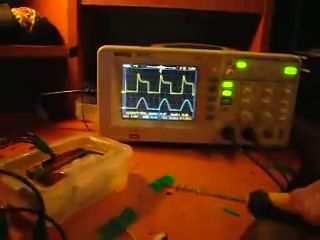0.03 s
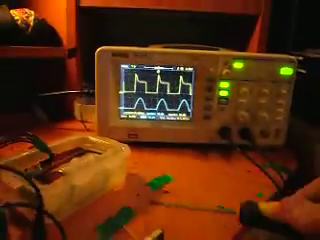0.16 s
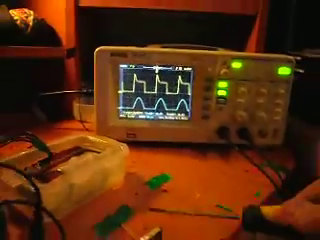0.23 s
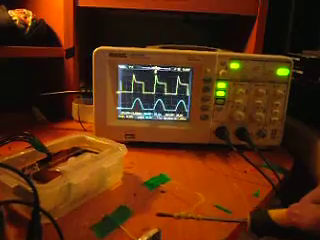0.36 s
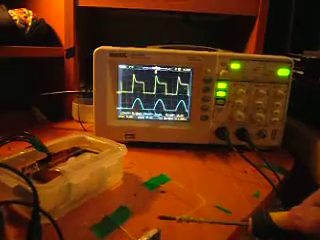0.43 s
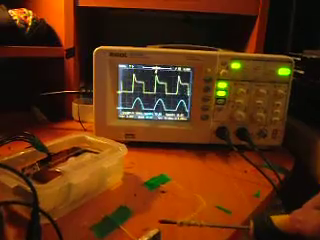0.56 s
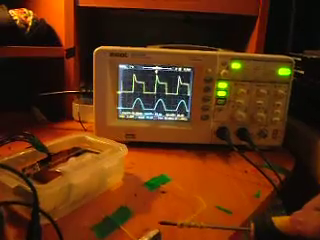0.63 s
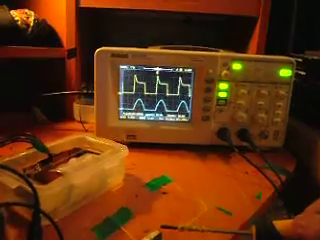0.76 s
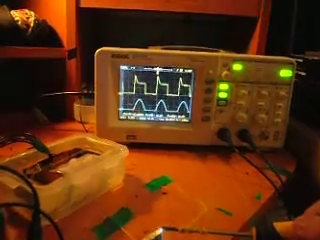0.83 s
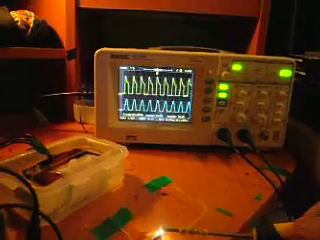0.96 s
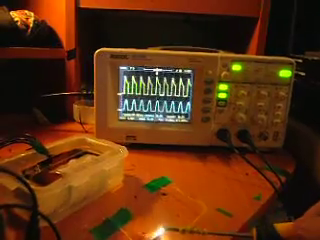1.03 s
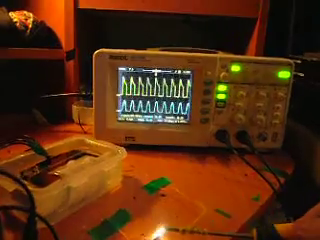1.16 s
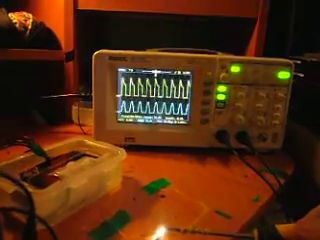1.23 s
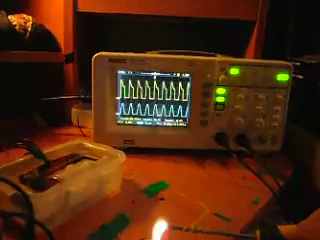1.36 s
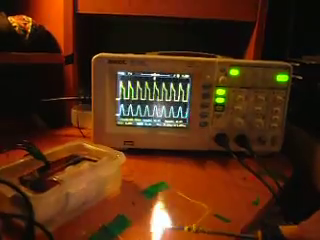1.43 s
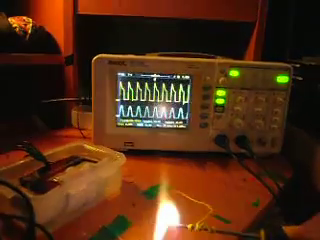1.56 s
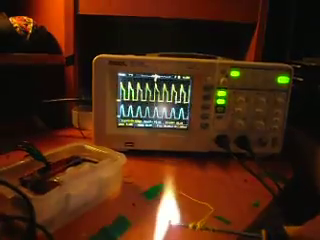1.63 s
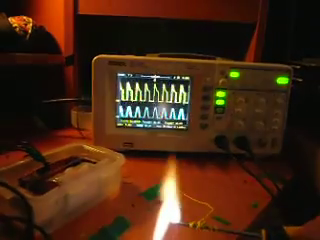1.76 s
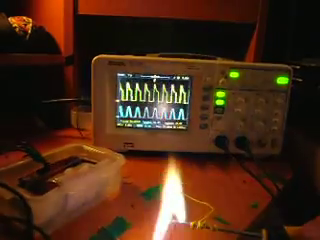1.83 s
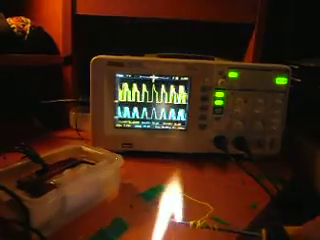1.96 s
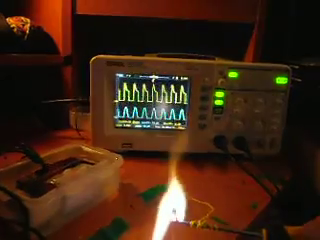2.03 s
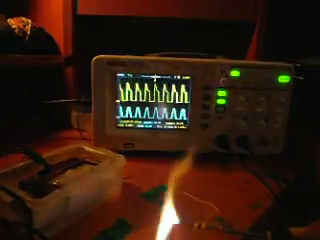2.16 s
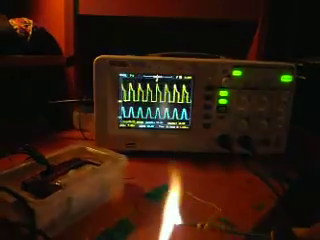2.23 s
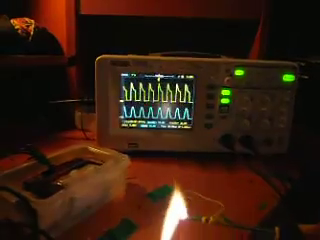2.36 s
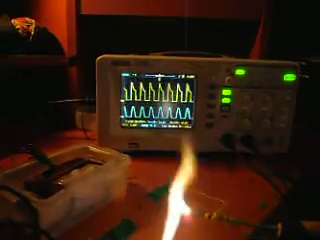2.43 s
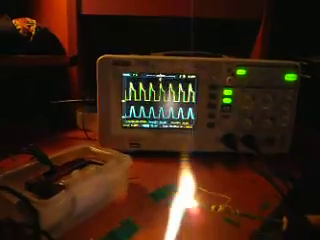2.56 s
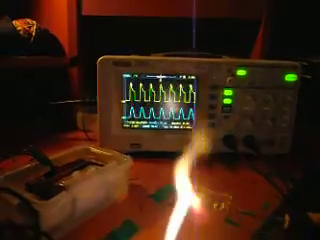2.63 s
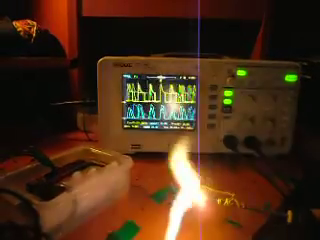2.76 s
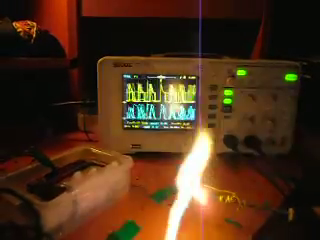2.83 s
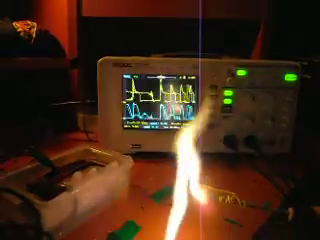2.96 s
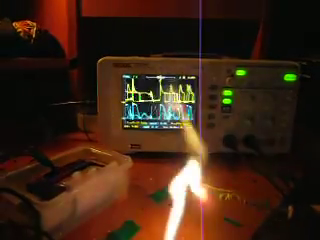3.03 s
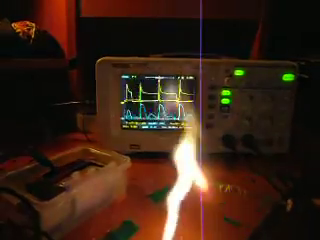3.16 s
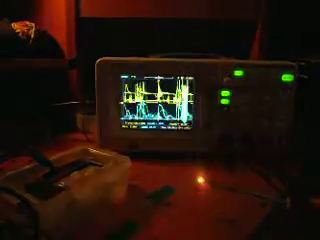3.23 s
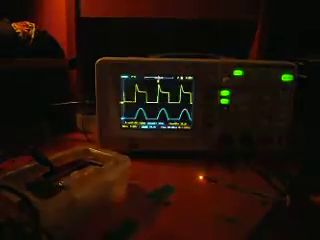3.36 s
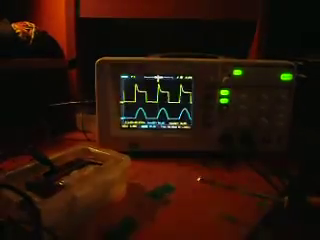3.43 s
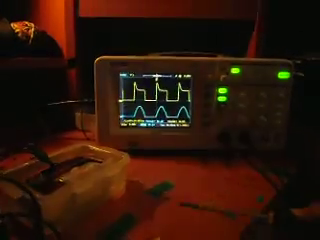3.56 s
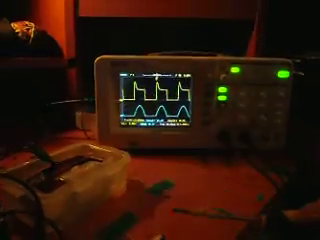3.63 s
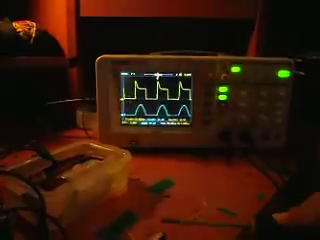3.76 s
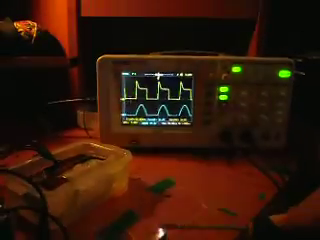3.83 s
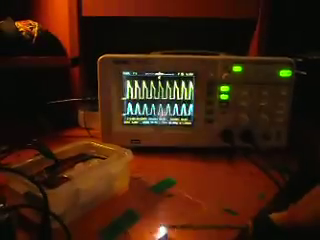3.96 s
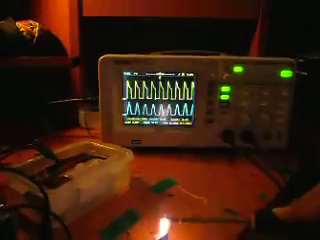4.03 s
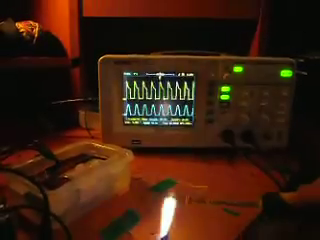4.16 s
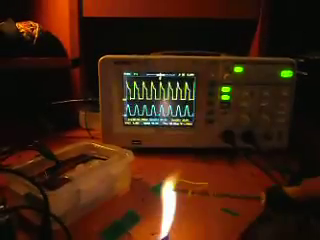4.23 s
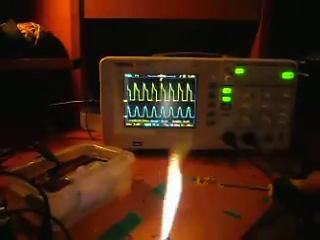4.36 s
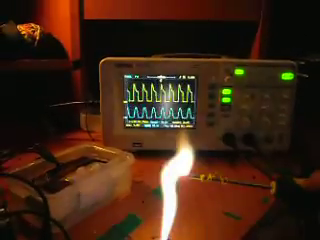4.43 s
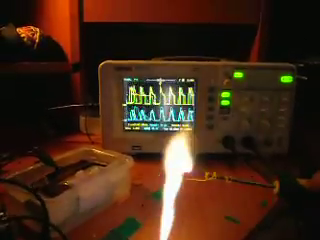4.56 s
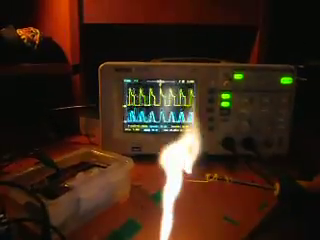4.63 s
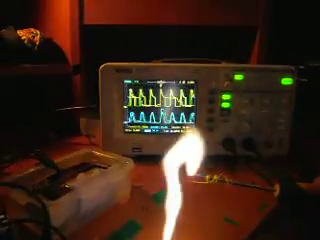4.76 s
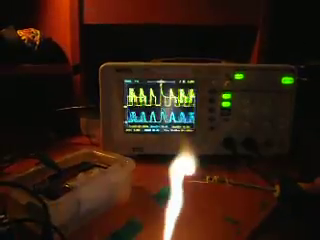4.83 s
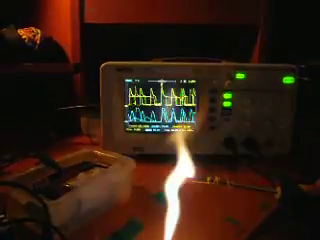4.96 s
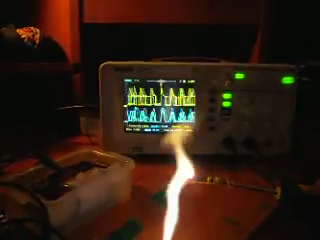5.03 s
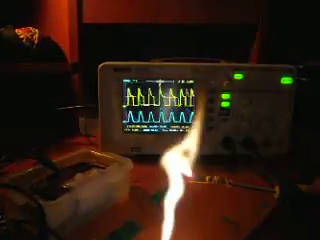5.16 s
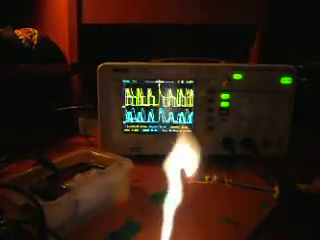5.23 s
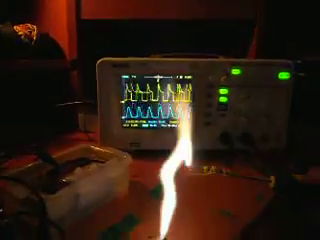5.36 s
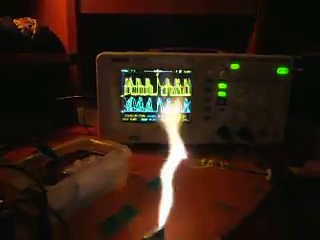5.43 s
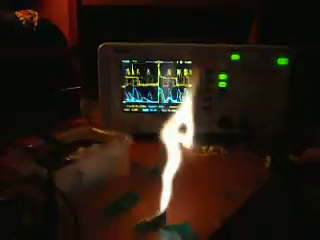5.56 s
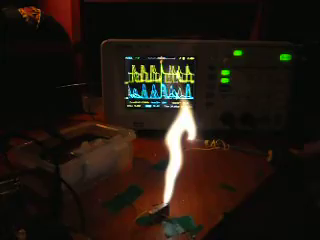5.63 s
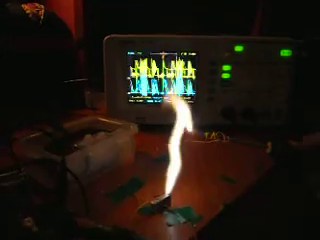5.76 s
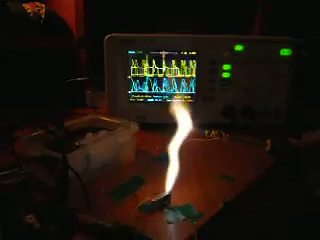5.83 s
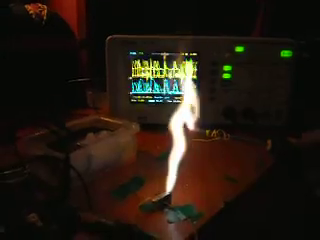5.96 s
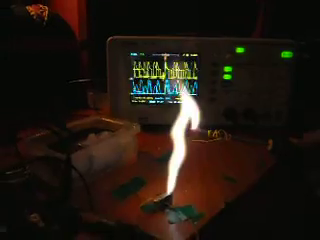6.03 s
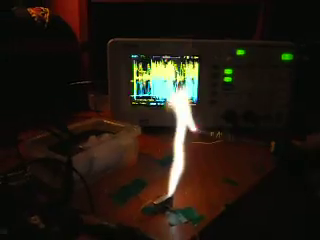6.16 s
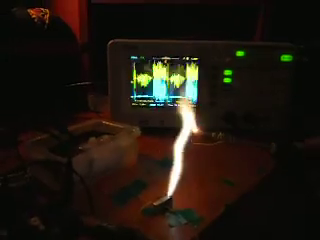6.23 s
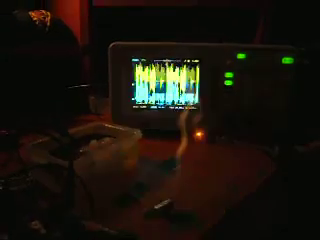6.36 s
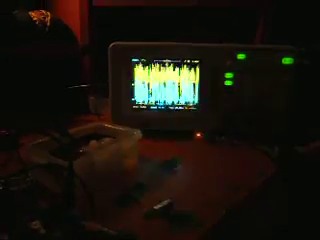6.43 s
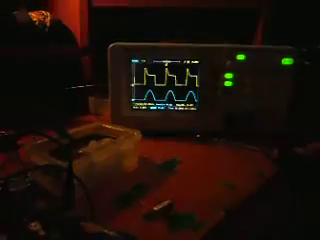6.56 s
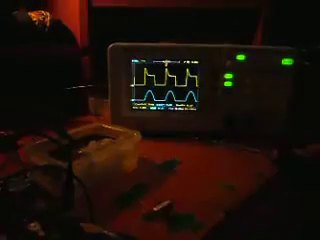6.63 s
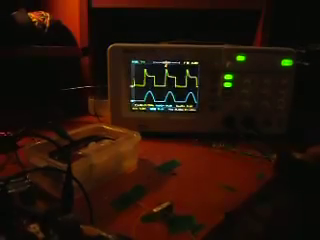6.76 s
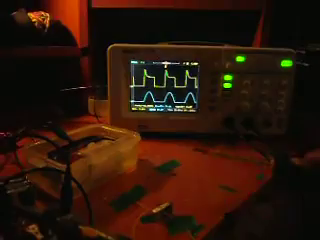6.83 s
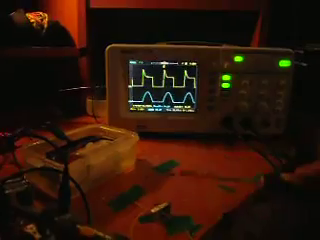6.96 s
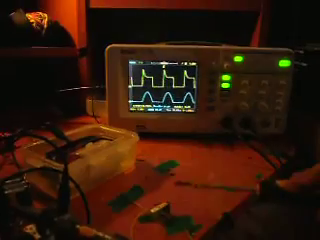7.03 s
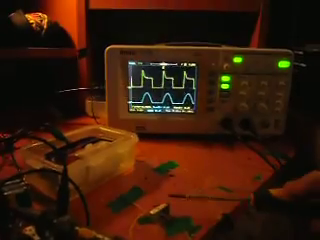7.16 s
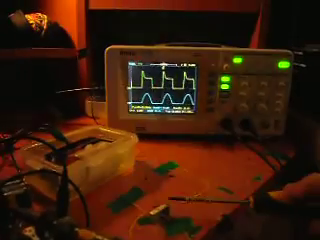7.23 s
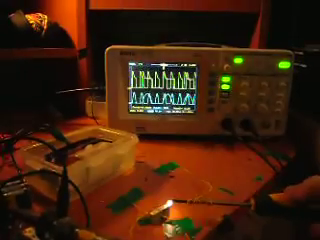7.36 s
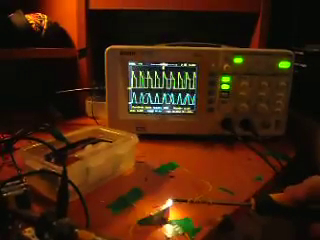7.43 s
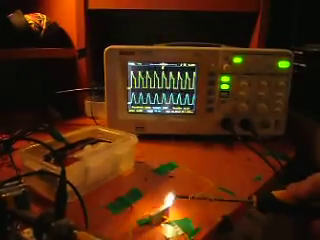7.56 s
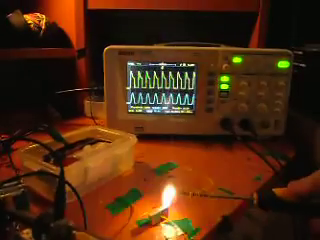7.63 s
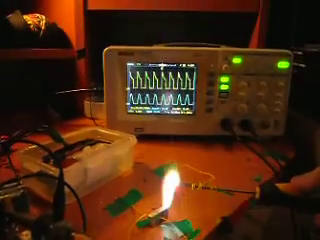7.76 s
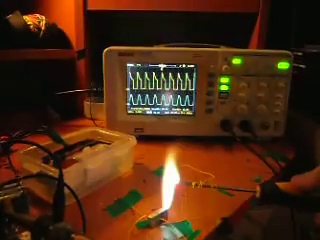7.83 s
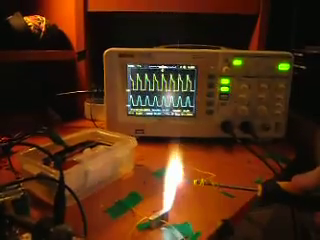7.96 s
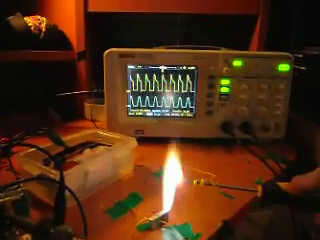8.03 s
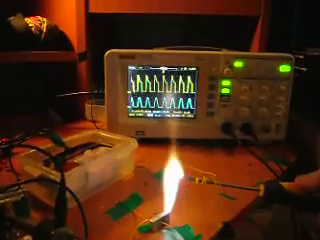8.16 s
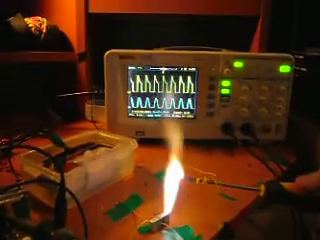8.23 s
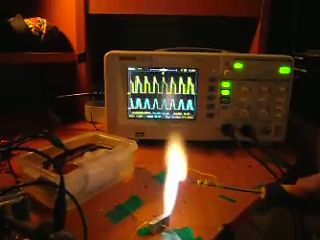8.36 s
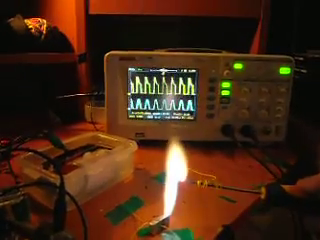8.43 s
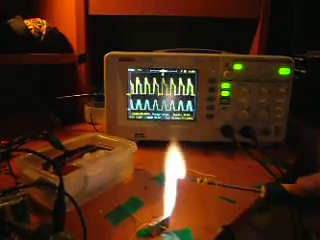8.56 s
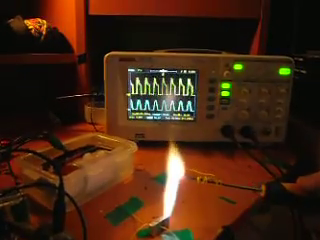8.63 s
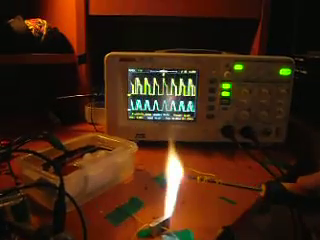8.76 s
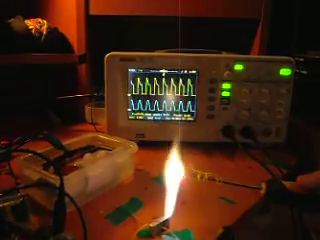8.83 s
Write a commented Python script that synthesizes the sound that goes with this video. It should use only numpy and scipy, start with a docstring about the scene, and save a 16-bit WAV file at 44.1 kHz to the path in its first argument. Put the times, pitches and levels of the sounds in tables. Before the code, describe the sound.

High-voltage arc drawn three times on a bench: snap, sputter and fry, harsh overloaded squeals twice, then a quieter crackling third with regular snaps.

```python
"""A steady thin tone and a faint hush come first, then snaps, as a homemade transformer draws an arc three times.
Random micro-discharges make the short arc sizzle and sputter; ringing ticks fry at its tip.
Stretched long, the arc breaks and restrikes in loud falling squeals: harmonics of a collapsing pulse rate.
The bench top adds one echo, a small room a short tail, and the squeals overload the microphone."""
import sys
import numpy as np
from scipy import signal
from scipy.fft import rfft, irfft
from scipy.io import wavfile

SR = 44100
rng = np.random.default_rng(int(sys.argv[2]) if len(sys.argv) > 2 else 0)


def generate_wav(sig):
    """Save sig (samples, or channels by samples) to the path in sys.argv[1] as 16-bit PCM at SR."""
    pcm = np.round(np.clip(np.atleast_2d(sig).T, -1, 1) * 32767).astype(np.int16)
    wavfile.write(sys.argv[1], SR, pcm)


N = 391608
T = np.arange(N) / SR  # seconds
HOLD_HZ, KNEE_HZ = 1947, 1628.5  # restrike rate: settled, and at the start of a dive


def undb(db):
    """Decibels to gain."""
    return 10 ** (np.asarray(db) / 20)


def curve(rows):
    """Join (s, value) rows by straight lines."""
    return np.interp(T, *np.transpose(rows))


def add(track, start_s, sound):
    """Mix a sound into a track at a time."""
    i = int(start_s * SR)
    track[i:i + len(sound)] += sound[:max(N - i, 0)]


def wander(n, hz):
    """Random line of spread near 1 that takes hz new values a second."""
    at = np.arange(n) * hz / SR
    knots = int(n * hz / SR) + 2
    return 1.2 * np.interp(at, np.arange(knots), rng.standard_normal(knots))


def gate(length_s):
    """Times and envelope of a burst that rises in about 1 ms and falls in 2 ms."""
    t = np.arange(max(int(length_s * SR), 2) + SR // 500) / SR
    return t, np.clip(np.minimum(t * 900, (t[-1] - t) * 500), 0, 1)


def decay(t, t60_s):
    """Exponential decay by 60 dB in t60_s."""
    return np.exp(-np.log(1000) * t / t60_s)


def response(points, size=2048):
    """Minimum-phase impulse response of a (Hz, dB) colour, low-passed at 9 kHz, with unit energy."""
    hz, db = np.transpose(points)
    bin_hz = np.arange(size // 2 + 1) * SR / size
    log_gain = np.log(undb(np.interp(np.log(bin_hz + 1), np.log(hz), db)))
    cepstrum = irfft(log_gain)[:size // 2]
    cepstrum[1:] *= 2  # fold to the causal side
    h = irfft(np.exp(rfft(cepstrum, size)))
    h = signal.sosfilt(signal.butter(8, 9000, fs=SR, output="sos"), h)
    return h / np.linalg.norm(h)


def through(x, h):
    """Pass a sound through an impulse response."""
    return signal.oaconvolve(x, h)[:N]


def sparks(per_second, scatter_db):
    """Randomly timed micro-discharges of unequal size and random sign, rms 1."""
    size = undb(scatter_db * np.minimum(rng.standard_normal(N), 2))
    clicks = (rng.random(N) < per_second / SR) * size
    clicks = clicks * rng.choice([-1, 1], N)
    return clicks / np.std(clicks)


def tone(tone_hz=873, drift_hz=.5, whine_hz=5900, whine_db=-75):
    """The electronics sing one nearly pure note, with a very faint whine far above it."""
    # Steady note. Each row: time in seconds, rms level in dB before the slight waver.
    tone_level = [(0, -57), (.6, -73), (1.1, -54), (2.5, -49.5), (3.15, -44.5), (3.6, -42), (4.3, -43),
                  (4.9, -43), (6.35, -66), (6.6, -58.5), (7.55, -67), (7.8, -56), (8.88, -50.5)]
    phase = 2 * np.pi * np.cumsum(tone_hz + drift_hz * wander(N, 6.7)) / SR
    waver_db = .5 * wander(N, 10)
    note = undb(curve(tone_level) + waver_db) * np.sin(phase)
    whine = undb(whine_db) * np.sin(2 * np.pi * whine_hz * T)
    return np.sqrt(2) * (note + whine)


def hush(level_db=-55, waver_db=.5):
    """Coloured noise of the room, its level wavering slightly."""
    # Hush spectrum. Each row: frequency in Hz, relative density in dB per Hz.
    hush_colour = [(15, -52.5), (25, -10.5), (141, -18), (290, -15.5), (351, -17), (387, -13), (492, -9.5),
                   (641, -15.5), (855, -8.5), (1560, -23), (7800, -27.5), (10100, -64), (17200, -120)]
    noise = through(rng.standard_normal(N), response(hush_colour))
    return noise * undb(level_db + waver_db * wander(N, 8.1))


def snaps(trim_db=-3.5, fizz=.16, fizz_s=.0016, lag_s=.000997):
    """One breakdown: a sharp pressure step with a brief fizz behind it, then a weaker afterstrike."""
    # Single breakdowns. Each row: time in seconds, level in dB before trim.
    snap_rows = [(0.756, -26.5), (1.597, -18), (1.669, -15), (1.773, -14.5), (1.844, -12), (1.958, -13),
                 (3.767, -16.5), (7.227, -15.5), (8.132, -16.5), (8.212, -18), (8.281, -17), (8.353, -18),
                 (8.429, -17.5), (8.499, -16.5), (8.567, -24.5), (8.647, -23), (8.703, -23), (8.789, -21),
                 (8.829, -23.5)]
    # Snap spectrum. Each row: frequency in Hz, relative density in dB per Hz.
    snap_colour = [(40, -13), (200, 5.5), (500, 4), (1000, 6), (1800, -1), (3500, 11), (5000, -1),
                   (7400, -7), (9000, -36)]
    afterstrike_s, afterstrike_db = .013, -12.5
    out, t = np.zeros(N), np.arange(SR // 100) / SR
    for start_s, db in snap_rows:
        for delay_s, drop_db in ((0, 0), (afterstrike_s, afterstrike_db)):
            crack = fizz * rng.standard_normal(len(t)) * np.exp(-t / fizz_s)
            crack[0] = 1
            add(out, start_s + lag_s + delay_s, undb(db + drop_db + trim_db) * crack)
    h = response(snap_colour)
    return through(out, h / np.abs(h).max())


def sizzle(top_db=-40.5, cooling_s=.015):
    """The burning arc crackles in clumps of a few ms, louder up to a ceiling as it is drawn, then fades."""
    # Draws of the arc. Each row: ignition in seconds, burning time in seconds,
    # level at ignition in dB before clumping, growth in dB per second.
    draw_rows = [(.756, 2.36, -58.5, 5.5), (3.77, 2.52, -59, 25.5), (7.226, 1.7, -62.5, 6)]
    # Sizzle spectrum. Each row: frequency in Hz, relative density in dB per Hz.
    sizzle_colour = [(100, -20.5), (1500, -14), (2800, -1), (4300, -1), (5500, -4), (7300, -7),
                     (9000, -12.5)]
    strength = np.zeros(N)
    for start_s, burn_s, db, db_per_s in draw_rows:
        age_s = np.maximum(T - start_s, 0)
        level = undb(np.minimum(db + db_per_s * age_s, top_db))
        fade = np.exp(-np.maximum(age_s - burn_s, 0) / cooling_s)
        strength += (T > start_s) * level * fade
    clumps_db = 5.5 * np.minimum(wander(N, 260), 1.8) - 3
    return through(sparks(2000, 1.8) * strength * undb(clumps_db), response(sizzle_colour))


def rod(ring_hz=365, t60_s=.23):
    """The hand-held electrode rings dully, as one decaying sine, when it touches its contact."""
    # Touches of the rod. Each row: time in seconds, initial amplitude in dB.
    touch_rows = [(0.759, -47.5), (.82, -47.5), (0.988, -48), (1.241, -50.5), (3.769, -51), (7.228, -51)]
    out, t = np.zeros(N), np.arange(SR // 2) / SR
    for start_s, db in touch_rows:
        add(out, start_s, undb(db) * np.sin(2 * np.pi * ring_hz * t) * decay(t, t60_s))
    return out


def frying(per_second=380, scatter_db=6.0, t60_s=.014, spread=.075):
    """Tiny ringing ticks at the metal tip, whose pitch sinks as it heats up."""
    # Frying spells. Each row: start in seconds, length in seconds, first pitch in Hz,
    # last pitch in Hz, rms level in dB over the length.
    frying_rows = [(1.228, 0.17, 4240, 3780, -43), (3.894, 0.065, 4330, 4000, -40),
                   (7.385, 0.32, 4300, 3770, -53)]
    out, t = np.zeros(N), T[:SR // 50]
    for start_s, length_s, first_hz, last_hz, db in frying_rows:
        when, chance = rng.random(SR // 100), rng.standard_normal((SR // 100, 2))
        ticks = np.zeros(N)
        for share, (size, detune) in zip(when[:int(per_second * length_s)], chance):
            hz = (first_hz + share * (last_hz - first_hz)) * (1 + spread * detune)
            tick = np.sin(2 * np.pi * hz * t) * decay(t, t60_s)
            add(ticks, start_s + share * length_s, undb(scatter_db * size) * tick)
        out += undb(db) * ticks * np.sqrt(length_s * SR / np.sum(ticks ** 2))
    return out


def sputters(flutter_db=3.5):
    """Spurts of dense micro-discharges at the electrode tip, each with its own level and a random grain."""
    # Sputter spurts. Each row: start in seconds, length in seconds, rms level in dB before colouring.
    sputter_rows = [ (1.302, 0.027, -42), (1.343, 0.026, -38), (1.431, 0.017, -35.5), (1.452, 0.063, -34),
                    (1.522, 0.024, -34.5), (1.57, .014, -35), (1.604, 0.041, -38), (1.673, 0.019, -35.5),
                    (1.752, 0.0082, -34.5), (1.78, 0.0074, -31.5), (1.844, 0.0097, -34),
                    (1.886, 0.0099, -37), (1.955, 0.028, -33), (1.994, 0.0091, -36), (2.004, 0.0092, -29.5),
                    (2.382, .008, -38.5), (2.412, 0.014, -38.5), (2.539, .012, -38), (3.109, .009, -26),
                    (4.102, 0.02, -38), (4.241, 0.011, -34.5), (4.397, 0.001, -12), (4.472, 0.0053, -18.5),
                    (4.668, 0.0033, -19), (4.761, 0.022, -34.5), (5.018, 0.0014, -13.5),
                    (5.142, 0.0045, -11), (5.211, 0.0033, -14), (6.12, 0.005, -20), (6.19, 0.013, -19.5),
                    (6.211, 0.019, -21), (6.275, .013, -17.5), (7.607, 0.009, -40.5), (7.849, 0.029, -47.5),
                    (8.017, 0.01, -39), (8.052, 0.0055, -40.5)]
    # Sputter spectrum. Each row: frequency in Hz, relative density in dB per Hz.
    sputter_colour = [(60, -23.5), (500, -20), (1000, -15), (1500, -19), (2700, -3.5), (3700, 3.5),
                      (4700, -1), (6000, -7), (7400, -9.5), (9000, -12.5)]
    out = np.zeros(N)
    grain = sparks(5000, 1.3) * undb(flutter_db * np.minimum(wander(N, 300), 1))
    for start_s, length_s, db in sputter_rows:
        t, on = gate(length_s)
        spurt = on * grain[int(start_s * SR):][:len(t)]
        even = np.linalg.norm(on) / (np.linalg.norm(spurt) + 1e-9)
        add(out, start_s, undb(db) * spurt * even)
    return through(out, response(sputter_colour))


def restrike_rate(settle_s=.009, dive_s=.016):
    """Restrike rate in Hz and time since collapse: a sawtooth following the flame's flicker, with shortcuts."""
    # Collapses of the rate, about 13 a second while the flame flickers. Each row: time in seconds,
    # lowest rate in Hz, rebound rate in Hz, both before shortcuts.
    collapse_rows = [ (2.62, 1000, 1967), (2.705, 1000, 1635), (2.775, 711, 2193), (2.81, 990, 1708),
                     (2.869, 850, 1500), (2.914, 945, 2216), (2.944, 533, 2279), (2.974, 1376, 2104),
                     (3.04, 984, 1146), (3.08, 776, 2206), (3.112, 754, 1960), (4.384, 1056, 1733),
                     (4.47, 1097, 1776), (4.55, 717, 1888), (4.608, 856, 1899), (4.696, 797, 1900),
                     (4.855, 1092, 1917), (4.931, 1018, 1897), (5.014, 1144, 1953), (5.096, 892, 1910),
                     (5.245, 803, 1849), (5.323, 774, 2370), (5.419, 1394, 1900), (5.495, 733, 2285),
                     (5.584, 890, 1967), (5.653, 817, 3140), (5.722, 756, 1966), (5.757, 1790, 2183),
                     (5.81, 902, 2985), (5.886, 801, 1983), (5.915, 1543, 2207), (5.967, 814, 2407),
                     (6.012, 1706, 1980), (6.053, 920, 2896), (6.118, 1010, 1900)]
    shortcuts_per_s, shortcut_hz, shortcut_s = 40, 330, .008
    hz, since_s = np.full(N, float(HOLD_HZ)), np.ones(N)
    for (start_s, _, rebound_hz), (end_s, lowest_hz, _) in zip(collapse_rows, collapse_rows[1:]):
        now = slice(int(start_s * SR), int(end_s * SR))
        since_s[now] = T[now] - start_s
        hold_hz = min(rebound_hz, HOLD_HZ)
        corners_hz = [hold_hz, min(hold_hz, KNEE_HZ), lowest_hz]
        sag_hz = np.interp(T[now], [start_s, end_s - dive_s, end_s], corners_hz)
        hz[now] = sag_hz + (rebound_hz - hold_hz) * np.exp(-since_s[now] / settle_s)
    # the writhing arc finds a shorter path: the rate jumps up and slides back
    last_shortcut_s = np.maximum.accumulate(T * (rng.random(N) < shortcuts_per_s / SR))
    jump = np.exp(-(T - last_shortcut_s) / shortcut_s)
    return hz + shortcut_hz * (jump - jump.mean()), since_s


def ring(x):
    """Fixed resonances around the arc light up whenever a harmonic sweeps across them."""
    # Resonances. Each row: centre in Hz, width in Hz, peak over the direct sound in dB.
    resonance_rows = [(536, 92, 7), (2963, 160, 4.5), (4650, 140, -5), (5642, 150, 5.5)]
    out = x
    for hz, width_hz, db in resonance_rows:
        b, a = signal.iirpeak(hz, hz / width_hz, fs=SR)
        out = out + undb(db) * signal.lfilter(b, a, x)
    return out


def squeals(waver=.2, jitter=.09, scatter_s=.00007, flutter_db=6, shape_db=5, hiss_db=1, first_db=2, count=14):
    """Each restrike is one pressure pulse; the rate sags as the arc stretches, and stray sparks fill the gaps."""
    # Spells of restriking. Each row: start in seconds, length in seconds, base roughness (0-1).
    squeal_rows = [ (1.4522, .001, .7), (2.628, .06, 0.23), (2.728, 0.072, 0.21), (2.81, .058, .2),
                   (2.868, 0.075, 0.48), (2.945, 0.1, 0.23), (3.041, .071, 0.39), (4.368, 0.027, 0.24),
                   (4.446, 0.022, 0.25), (4.51, 0.008, 0.31), (4.521, 0.047, 0.42), (4.581, .055, .36),
                   (4.682, 0.032, 0.47), (4.841, .028, 0.22), (4.913, 0.029, 0.21), (4.995, .011, 0.21),
                   (5.064, .031, 0.27), (5.154, 0.047, 0.23), (5.227, .02, 0.3), (5.256, .066, .38),
                   (5.327, .071, 0.23), (5.408, 0.25, .19), (5.662, 0.016, 0.34), (5.694, 0.14, 0.16),
                   (5.854, 0.12, 0.14), (5.982, 0.073, 0.16), (6.066, 0.038, .27)]
    # Strength of the restrikes. Each row: time in seconds, gain in dB before the dip.
    drive_rows = [(2.63, -8.5), (3.1, -11), (4.37, -12), (5.2, -12), (5.4, -9.5), (6.1, -11)]
    # Squeal spectrum. Each row: frequency in Hz, relative density in dB per Hz.
    squeal_colour = [(40, -39), (300, -17), (650, -18), (1050, -2.5), (1330, -6), (1900, -1), (2400, -0.5),
                     (3600, -8.5), (4600, -1), (5700, -6.5), (7300, -5), (9000, -13.5)]
    dive_rough = .1  # roughness added deep in a dive
    dip_db, dip_s = -6.5, .0052  # the squeal falters just after a collapse
    out, stray = np.zeros(N), sparks(9000, 3.6)
    slow, fast, size, early, shape = (wander(N, hz) for hz in (220, 1500, 600, 2500, 160))
    k = np.arange(1, count + 1)[:, None]  # harmonic numbers
    rate_hz, since_s = restrike_rate()
    for start_s, length_s, rough in squeal_rows:
        t, on = gate(length_s)
        now = int(start_s * SR) + np.arange(len(t))
        hz = rate_hz[now]
        rough = np.clip(rough + dive_rough * np.clip(2 - 2 * hz / KNEE_HZ, 0, 1), .05, .9)
        unsteady_hz = hz * (1 + rough * (waver * slow[now] + jitter * fast[now]))
        phase = 2 * np.pi * np.cumsum(unsteady_hz) / SR
        # early or late pulses tear the upper harmonics and spare the first
        phase += 2 * np.pi * hz * scatter_s * rough * early[now]
        # the writhing arc keeps changing the pulse shape, so each overtone comes and goes
        swing_db = shape_db * shape[(now + k * SR // 3) % N]
        weight = undb(np.where(k == 1, first_db + swing_db / 2, swing_db - 2.0))
        harmonics = weight * np.cos(k * phase) * (k * hz < SR / 4)
        pulses = np.sum(harmonics, axis=0) * np.sqrt(4 * hz / SR)
        pulses = pulses * undb(flutter_db * rough * size[now]) * np.sqrt(1 - rough)
        # slow restrikes shed fewer sparks
        gaps = rough * undb(hiss_db) * stray[now] * np.sqrt(hz / HOLD_HZ)
        add(out, start_s, on * (pulses + gaps))
    level_db = curve(drive_rows) + dip_db * np.exp(-since_s / dip_s)
    return through(ring(out * undb(level_db)), response(squeal_colour))


def whistles(waver=.014):
    """For a moment the arc pulses so fast and evenly that only one line is left."""
    # Thin whistles. Each row: start in seconds, length in seconds, mean pitch in Hz, amplitude in dB.
    whistle_rows = [(5.654, 0.0047, 7310, -4.5), (5.809, 0.0064, 7350, -8.5), (5.883, 0.0079, 7470, -7.5),
                    (5.966, 0.013, 7580, -7.5), (6.052, 0.012, 8140, -11.5), (6.105, .007, 7840, -7),
                    (7.226, 0.024, 4316, -34.5), (7.246, 0.056, 4480, -52.5)]
    out, drift = np.zeros(N), wander(N, 400)
    for start_s, length_s, hz, db in whistle_rows:
        t, on = gate(length_s)
        pitch_hz = hz * (1 + waver * drift[int(start_s * SR):][:len(t)])
        phase = 2 * np.pi * np.cumsum(pitch_hz) / SR
        add(out, start_s, undb(db) * on * np.sin(phase))
    return out


def bench(x, reflect=.31, lag_s=.00109):
    """The bench top returns each spark a millisecond later, which ribs the spectrum."""
    echo = np.interp(T - lag_s, T, x, left=0)
    return (x + reflect * echo) / np.hypot(1, reflect)


def room(x, t60_s=.19, wet_db=-15, gap_s=.0045):
    """A small furnished room adds a short tail of decaying noise."""
    t = T[:SR // 2]
    tail = rng.standard_normal(len(t)) * decay(t, t60_s) * (t > gap_s)
    return x + undb(wet_db) * through(x, tail / np.linalg.norm(tail))


def scene():
    """The arc over the bench in its room, with the rod, the tone and the hush."""
    arc = snaps() + sizzle() + frying() + sputters() + squeals() + whistles()
    return (tone() + hush() + rod() + room(bench(arc)))[None]


def record(dry, limit=.42, ceiling=.71, rail=.67, band_hz=8100, top_hz=16000):
    """A fast limiter and saturation hold the squeals down; a filter ends near 8 kHz; the tallest peaks clip."""
    power = signal.lfilter([1 / 130], [1, 1 / 130 - 1], dry ** 2)  # 130-sample average
    held = dry / (1 + (power / limit ** 2) ** 2) ** (1 / 4)
    rounded = held / (1 + (held / ceiling) ** 6) ** (1 / 6)
    band = signal.firwin(81, band_hz, window=("kaiser", 7), fs=SR)
    narrow = signal.fftconvolve(rounded, band[None], mode="same")
    clipped = np.clip(narrow, -rail, rail)
    return signal.sosfilt(signal.ellip(8, .2, 70, top_hz, fs=SR, output="sos"), clipped)


dry = scene()
out = record(dry)
generate_wav(out)
```